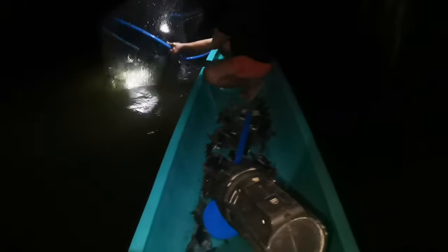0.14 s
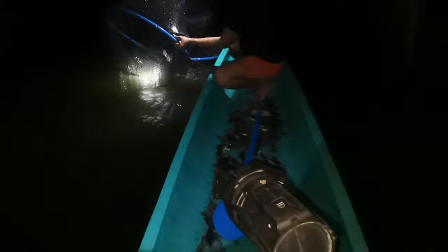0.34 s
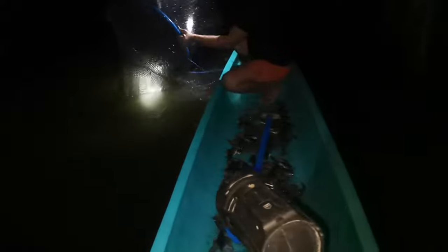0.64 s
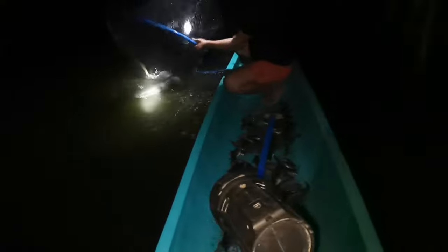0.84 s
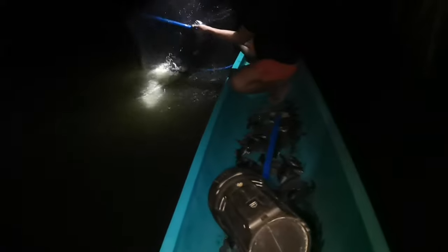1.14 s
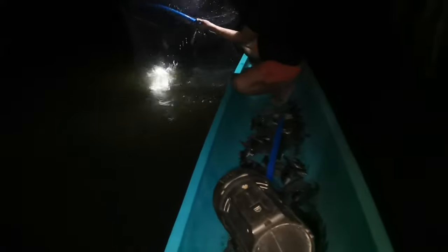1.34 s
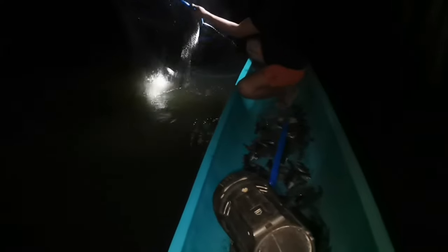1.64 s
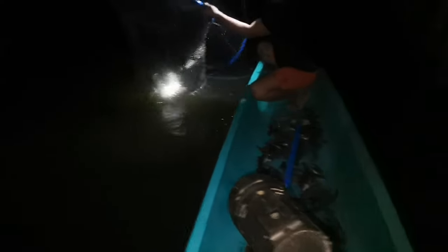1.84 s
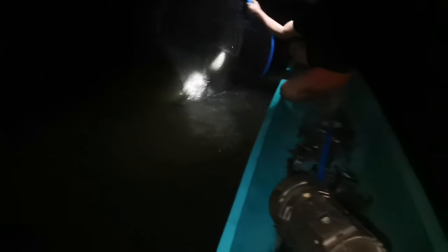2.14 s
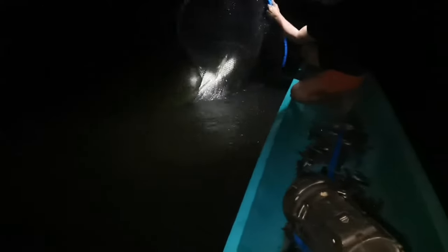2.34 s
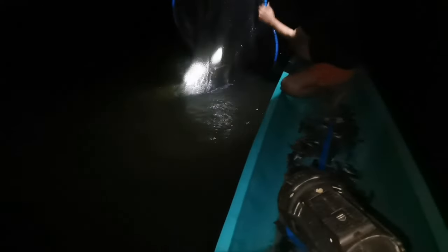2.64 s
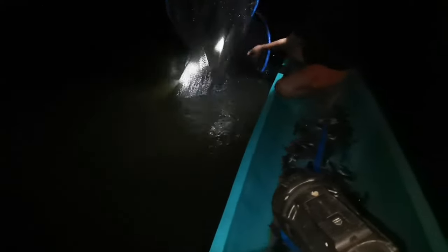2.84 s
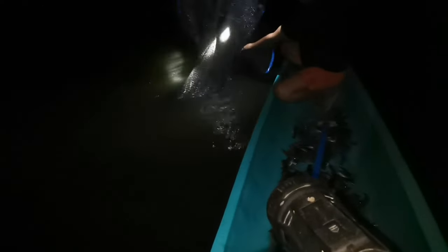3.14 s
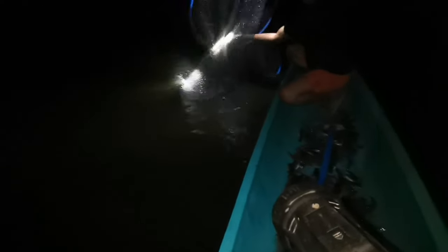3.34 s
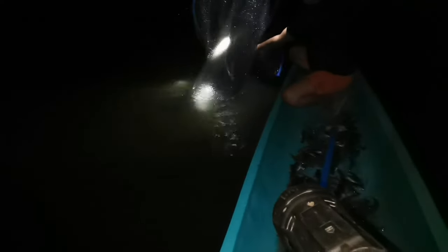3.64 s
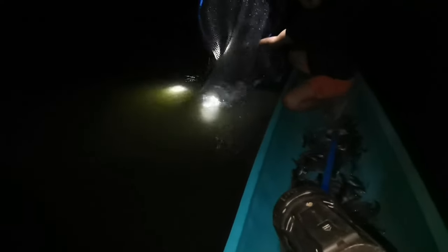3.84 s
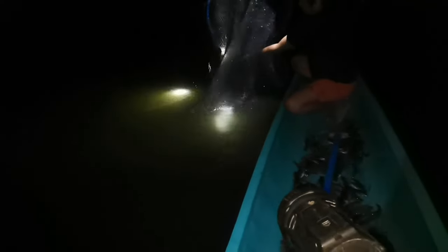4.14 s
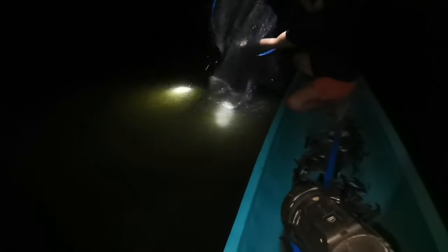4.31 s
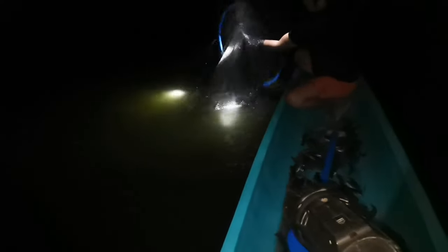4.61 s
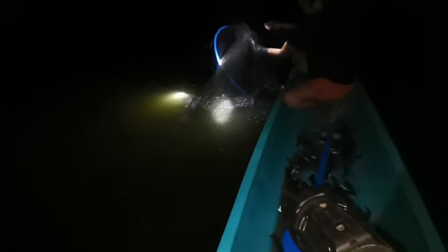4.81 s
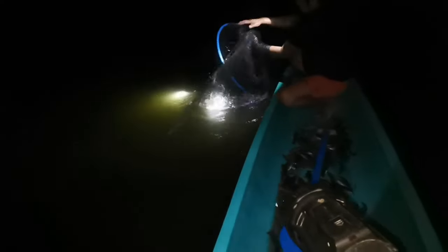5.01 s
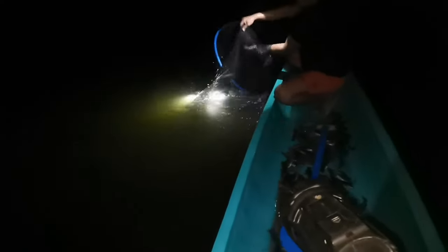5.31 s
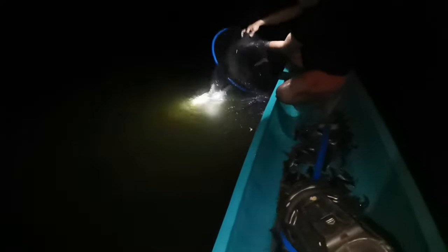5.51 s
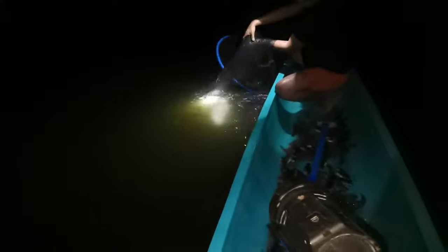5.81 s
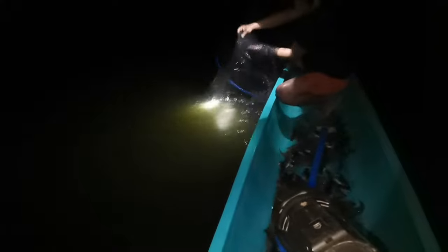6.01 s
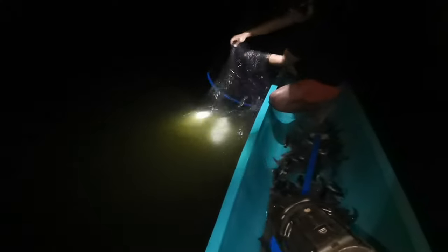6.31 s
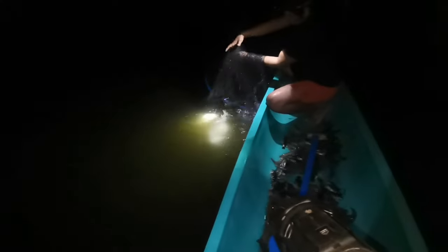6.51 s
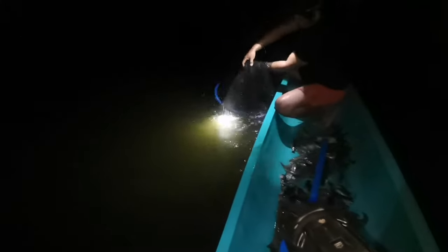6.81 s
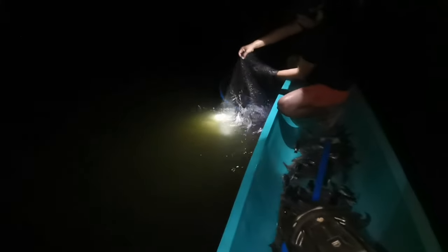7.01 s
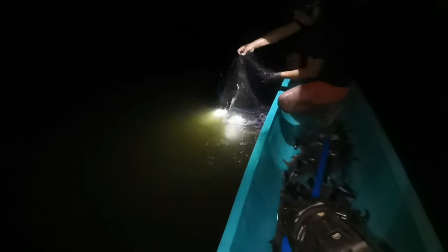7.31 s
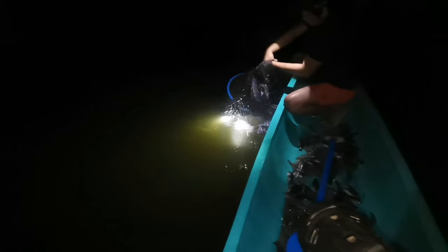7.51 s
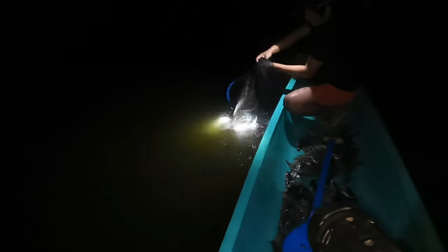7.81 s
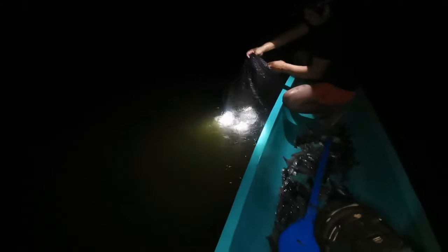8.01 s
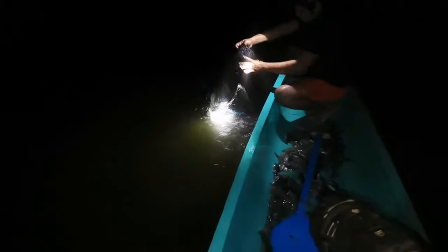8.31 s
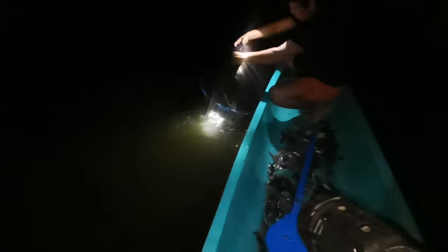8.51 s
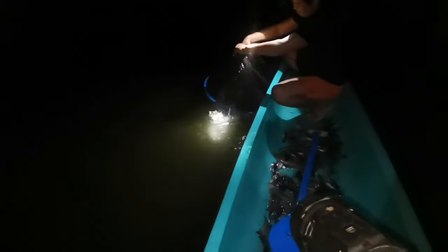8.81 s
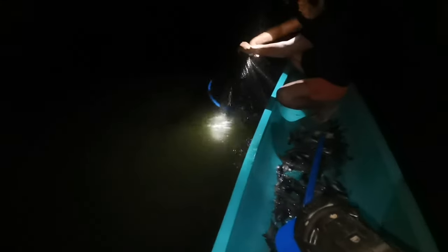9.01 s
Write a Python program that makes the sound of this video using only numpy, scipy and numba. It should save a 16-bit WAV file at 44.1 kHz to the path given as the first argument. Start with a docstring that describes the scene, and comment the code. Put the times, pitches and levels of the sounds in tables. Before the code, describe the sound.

Water gurgles, plops and drips off a net hauled from a pond at night, while a cricket chirps over a light rumbling breeze.

```python
"""A cricket chirps over a rumbling breeze as water starts to gurgle off a net hauled up beside a small
boat on a pond at night. The water sounds through bubbles, each a damped oscillator: large ones plop,
drops splat and fine spray fizzes; there is one sharp knock. The cricket, a katydid to the right and a
fitful third insect stridulate, driving wing resonances. One soft hoot passes, eddies buffet both
microphone ports, and far insects and lapping water merge into a hiss."""
import sys
import numpy as np
from scipy import signal
from scipy.fft import rfft, irfft, next_fast_len
from scipy.io import wavfile
from scipy.ndimage import uniform_filter1d, map_coordinates
from numba import njit

SR = 44100
rng = np.random.default_rng(int(sys.argv[2]) if len(sys.argv) > 2 else 0)


def store_wav(level_fs):
    """Save 16-bit WAV to argv[1]."""
    pcm = np.round(np.clip(np.atleast_2d(level_fs), -1, 1) * 32767)
    wavfile.write(sys.argv[1], SR, pcm.T.astype(np.int16))


N = 403499
SIDES = np.array([[1], [-1]])  # left, right; pan is the left level minus the right


# gushes off the shaken net: t/s, length/s, gurgle level/dB, fizz level/dB, spray level/dB, first f/Hz
GUSHES = [(0.541, 0.072, -62, -52, -52.5, 1300), (0.663, 0.078, -58, -50, -51, 1340),
          (0.81, 0.11, -54.5, -54.5, -79, 1156), (1.013, 0.15, -47.5, -46, -47.5, 1260),
          (1.224, 0.12, -57.5, -55, -54, 1240), (1.82, 0.16, -49.5, -53, -58, 1220),
          (1.998, 0.16, -51.5, -52.5, -55, 1080), (2.324, 0.15, -57, -62.5, -76, 1030),
          (2.847, 0.011, -52.5, -47.5, -52.5, 1120), (3.42, 0.027, -49, -45.5, -48, 1100),
          (3.482, 0.087, -57.5, -75, -79, 1210), (3.926, 0.094, -49, -53, -63, 907),
          (4.066, 0.14, -60, -54, -58, 1240), (4.414, 0.061, -50.5, -54, -53, 930),
          (4.535, 0.072, -45, -44.5, -48, 918), (4.799, 0.13, -55, -47.5, -53, 1234),
          (5.003, 0.22, -46, -50, -50, 1235), (5.284, 0.13, -51, -52, -56.5, 1003),
          (5.695, 0.031, -53.5, -52, -51.5, 1160), (5.783, 0.031, -55.5, -53.5, -56, 1100),
          (6.132, 0.056, -46, -56.5, -58.5, 1116), (6.33, 0.074, -59, -53, -53, 1050),
          (6.544, 0.075, -47.5, -52.5, -59, 1112), (6.7, 0.13, -53.5, -58, -78, 1114),
          (6.927, 0.14, -88, -86, -47, 1006), (7.142, 0.12, -49.5, -54, -55.5, 1092),
          (7.571, 0.17, -54.5, -54, -55.5, 947), (7.822, 0.1, -62.5, -55.5, -57.5, 1055),
          (7.963, 0.11, -50.5, -49.5, -55, 1228), (8.266, 0.017, -53.5, -52.5, -75, 1225),
          (8.35, 0.12, -53.5, -53, -64, 1100), (8.7, 0.02, -75, -70, -55, 1210),
          (8.792, 0.13, -55.5, -54, -65, 1077), (8.933, 0.07, -66, -57.5, -54, 1120)]

def runoff(trickle_hz=1005, sag_octaves_s=1.22):
    """Incoherent sources add in power: gushes, trickle and splats set three levels and a gurgle pitch."""
    t = np.arange(0, N / SR + .002, .002)
    s, length, *levels, first_hz = np.transpose(GUSHES)[:, :, None]
    slopes_db_s = (405, 8, 213), (517, 10, 233), (480, 12, 213)  # gurgle, fizz, spray
    trickle = undb((-68, -66, -65)) ** 2
    gush = [undb(db + envelope(t - s, length, *slopes)) ** 2 for db, slopes in zip(levels, slopes_db_s)]
    hz = first_hz * 2 ** (-sag_octaves_s * np.clip(t - s, 0, length))  # bubbles grow, so pitch sinks
    gurgle_hz = ((gush[0] * hz).sum(0) + trickle[0] * trickle_hz) / (gush[0].sum(0) + trickle[0])
    hit_s, hit_db, *_ = np.transpose(SPLATS)[:, :, None]
    burst = (undb(hit_db - 19.5 + envelope(t - hit_s, 0, 720, 0, 514)) ** 2).sum(0)
    power = np.sum(gush, axis=1) + trickle[:, None]
    power[1:] += burst  # splats throw up fizz and spray
    return curves(np.transpose([t, *(10 * np.log10(power)), gurgle_hz]))


def water():
    """Bubble resonance rises as radius falls: slosh and gurgle from large bubbles, fizz from small."""
    gurgle_db, fizz_db, spray_db, gurgle_hz = runoff()
    surge_db = 1.2 * walk(22)  # runoff comes in spurts
    patter = walk(170)  # droplets land in quick clusters
    gurgle = swarm(9000, gurgle_hz, octaves=.4024, cycles=34, rise=11.4, scatter=3.35, pan=3.8, width=4.2)
    slosh = swarm(2500, hz=436, octaves=.347, cycles=13.6, rise=20., scatter=4.1, pan=2.2, width=2.4)
    fizz = swarm(32000, hz=3026, octaves=.531, cycles=31.4, rise=3.7, scatter=1.55, pan=5.4, width=7.6)
    spray = swarm(50000, hz=7590, octaves=.48, cycles=13.3, rise=3.3, scatter=2.15, pan=.04, width=4.7)
    drips = swarm(1200, hz=3800, octaves=.7, cycles=59, rise=3.4, scatter=1.5, pan=.31, width=7.1)
    return (gurgle * undb(gurgle_db + surge_db)
            + slosh * undb(.81 * gurgle_db - 20)
            + fizz * undb(fizz_db - 6 + surge_db + 1.7 * patter)
            + spray * undb(spray_db - 5.5 + surge_db + 2.32 * patter)
            + drips * undb(fizz_db - 11))


def swarm(count, hz, octaves, cycles, rise, scatter, pan, width):
    """Superposition of bubbles random in time, size and place, at unit RMS; scatter and pan are in dB."""
    when, rarity, life = rng.random((count, 3)).T
    pitch, place = rng.standard_normal((count, 2)).T
    db = -scatter * np.log(rarity + .00058)
    centre_hz = (hz + np.zeros(N))[(when * N).astype(int)]
    return unit(bubbles(when * N / SR, centre_hz * 2 ** (octaves * pitch), cycles * (.5 + life), db,
                        pan_db=pan + 8.4 * place, lag=5.94 + .35 * width * place, rise=rise, glide=.054))


# large plops and one sharp knock: t/s, relative level/dB, f/Hz, ring time/cycles
PLOPS = [(0.578, -36, 2420, 19), (0.821, -35.5, 1320, 21), (1.023, -34, 1300, 29), (1.151, -24, 443, 15),
         (1.313, -34, 930, 23), (1.525, -32, 2010, 8.7), (1.805, -32.5, 1120, 36), (1.844, -34, 887, 31),
         (1.874, -27, 1380, 15.5), (2.334, -32, 2460, 17.3), (2.345, -32.5, 930, 11), (2.885, -39, 820, 12),
         (3.506, -31.5, 960, 20), (3.766, -42, 1390, 59), (3.954, -19, 894, 26), (4.001, -26, 842, 38),
         (4.146, -40, 1410, 54), (4.287, -38, 2470, 22), (4.399, -28, 798, 33), (4.547, -31, 792, 18),
         (5.037, -41, 1320, 11), (5.059, -16.5, 1414, 16.7), (5.1, -29.5, 446, 15.5),
         (5.112, -33.5, 297, 24), (5.13, -38, 1290, 27), (5.175, -36, 740, 25), (5.293, -43, 2390, 35),
         (5.305, -36, 592, 20), (5.372, -33.5, 486, 11), (5.687, -43, 2820, 16), (5.71, -23.5, 1170, 34),
         (5.788, -34.5, 915, 37), (6.1, -35, 1070, 8.5), (6.405, -35.5, 994, 36), (6.568, -30.5, 1280, 13),
         (6.602, -40.5, 494, 25), (6.76, -36, 1280, 25), (7.133, -42, 700, 18), (7.162, -37.5, 1165, 38),
         (7.193, -35, 1037, 40), (7.252, -39, 1280, 70), (7.593, -35, 610, 25), (7.652, -34, 870, 19),
         (7.982, -27.5, 1940, 10.6), (8.008, -33.5, 1950, 15), (8.021, -36, 950, 20.7),
         (8.049, -35.5, 617, 11.6), (8.1, -39, 473, 16), (8.395, -37.5, 973, 66), (8.773, -37.5, 1070, 17),
         (8.853, -34, 1260, 15), (8.897, -36, 750, 35)]

def plops(count=16):
    """Free oscillation: each plop or knock rings and rises in pitch amid a froth of small bubbles."""
    s, db, hz, cycles = np.transpose(PLOPS)[:, :, None]
    main = bubbles(s, hz, cycles, db + 1, pan_db=5, lag=6, rise=6., glide=.012)
    when, pitch, size = np.moveaxis(rng.standard_normal((len(PLOPS), count, 3)), -1, 0)
    froth_s = s + cycles / hz * (.03 + .22 * np.abs(when))
    froth_hz = hz * 2 ** (.814 * np.abs(pitch) - .3)
    froth_db = db - 10.5 - 4.5 * np.abs(pitch) + 4.5 * size
    froth = bubbles(froth_s, froth_hz, cycles=14, db=froth_db, pan_db=4, lag=6 + when, rise=5.4, glide=.065)
    return main + froth


# drops bursting on water and hull: t/s, relative level/dB, centre f/Hz, spatter time/ms
SPLATS = [(0.215, -39, 3730, 3.4), (0.575, -30.5, 7800, 3.8), (0.82, -40, 5360, 3.9),
          (1.147, -34, 2470, 5.6), (1.2445, -24.5, 8640, 3.65), (1.789, -33.5, 8910, 0.84),
          (1.878, -32, 5100, 2.8), (2.0293, -26.5, 5370, 2.66), (2.129, -34, 5410, 2.6),
          (2.424, -37, 6300, 2.7), (3.412, -35, 3480, 3), (3.429, -28, 4800, 4.8), (3.439, -38, 4200, 2.8),
          (3.498, -37.5, 4500, 1.3), (3.5058, -25.5, 8400, 2.2), (3.654, -35, 5200, 1.4),
          (3.68, -33.5, 7800, 3.6), (3.769, -39.5, 4500, 3.7), (3.904, -37, 3780, 2.9),
          (3.936, -25, 5040, 6.8), (3.955, -27.5, 2980, 4.3), (4.077, -37.5, 3660, 3.8),
          (4.3898, -28, 5360, 3.5), (4.6033, -28.5, 5500, 2.2), (4.7898, -34, 6250, 2.8),
          (4.981, -31, 3340, 2.97), (5.0767, -28, 7060, 3.8), (5.2866, -40, 6960, 2.9),
          (5.6286, -33, 9500, 2.2), (5.706, -32.5, 3330, 3.5), (6.108, -30.5, 3630, 2.8),
          (6.382, -28.5, 7160, 2.6), (6.7356, -30.5, 5400, 2.1), (6.8083, -31.5, 7850, 2.1),
          (7.11, -35, 4350, 2.7), (7.3732, -31, 3830, 2.4), (7.53, -38.5, 3600, 1.7),
          (7.546, -32, 3020, 2.5), (7.567, -26, 5500, 3.2), (7.644, -39.5, 4300, 1.7),
          (8.2294, -32.5, 7600, 2.8), (8.247, -36.5, 4000, 2.6), (8.3518, -32.5, 3400, 3),
          (8.399, -32.5, 3500, 3.04), (8.6326, -31, 4630, 1.46), (8.701, -35, 5900, 2.8),
          (8.779, -37, 2500, 3.4)]

def splats(count=40):
    """Impact excitation: a drop cracks and breaks into droplets that thin out exponentially."""
    s, db, hz, spatter_ms = np.transpose(SPLATS)[:, :, None]
    chance, jitter, place = np.moveaxis(rng.random((len(SPLATS), count, 3)), -1, 0)
    droplet_hz = hz * 2 ** (.55 * rng.standard_normal((len(SPLATS), count)))
    crack = np.arange(count) < 3
    delay = np.where(crack, .1 * chance, -np.log(chance + .013) + .3 * jitter)
    droplet_db = db - 5.5 + 8.9 * crack - 1.36 * delay
    return bubbles(s + delay * spatter_ms / 1000, droplet_hz, cycles=6, db=droplet_db,
                   pan_db=.74, lag=4.5 + 3 * place, rise=3.15, glide=0.)


def bubbles(s, hz, cycles, db, pan_db, lag, rise, glide):
    """Arrival-time difference: low notes reach the right port slightly later, widening the water sound."""
    s, hz, cycles, db, pan_db, lag = map(np.ravel, np.broadcast_arrays(s, hz, cycles, db, pan_db, lag))
    start = np.clip(s * SR, 0, N - 1).astype(int)
    omega = 2 * np.pi * np.clip(hz, 100, 15000) / SR
    left, right = undb(db + SIDES * pan_db / 2)
    lag = np.clip(lag + 3800 / np.maximum(hz, 700), 0, 60).astype(int)  # samples
    return ring(N, start, omega, np.maximum(cycles, .5), rise, glide, left, right, lag)


@njit
def ring(n, start, omega, cycles, rise, glide, left, right, lag):
    """Damped oscillators (omega in rad/sample) swell over `rise` rad and lose 60 dB in `cycles` periods."""
    out = np.zeros((2, n + 4096))
    for b in range(len(start)):
        decay = np.exp(-1.1 * omega[b] / cycles[b])
        amplitude, phase, w = 1., 0., omega[b]
        for i in range(4000):
            pressure = amplitude * min(i * w / rise, 1.) * np.sin(phase)
            out[0, start[b] + i] += left[b] * pressure
            out[1, start[b] + i + lag[b]] += right[b] * pressure
            phase += w
            amplitude *= decay
            w = min(w * (1 + glide * omega[b] / cycles[b]), 2.8)  # the pitch slides up
            if amplitude < .003:
                break
    return out[:, :n]


# response to the water sounds: f/Hz, gain/dB
PORT_RESPONSE = [(300, -0.5), (920, 0.5), (1090, -2.5), (1280, 1.5), (5500, 5.5), (7800, 12), (10000, 2.5),
                 (12500, -4.5), (15000, -3.5)]
# delay at the left port as the boat turns: t/s, delay/samples
LEFT_DELAY = [(0, 3.9), (1.6, 2.96), (2.8, 6.34), (9.15, 7.86)]

def water_path(x):
    """Interference with the hull echo cuts a notch, port resonance adds a peak, and the left delay drifts."""
    left, right = colour(x, PORT_RESPONSE)
    delayed = map_coordinates(left, [np.arange(N) - curves(LEFT_DELAY)[0]], mode="nearest")
    return np.array([delayed, right])


# quickening strokes that open the cricket's phrases: t/s, number of strokes
OPENINGS = [(0.443, 5), (0.838, 6), (1.826, 6), (2.639, 6), (3.578, 4), (4.132, 6), (5.167, 6), (5.998, 4),
            (6.948, 5), (7.87, 5), (8.592, 5)]
# its chirps: t/s, number of strokes
CHIRPS = [(0.004, 2), (0.138, 2), (0.276, 2), (1.177, 2), (1.298, 2), (1.416, 2), (1.534, 2), (1.668, 2),
          (2.154, 3), (2.31, 3), (2.468, 3), (2.961, 3), (3.127, 2), (3.244, 2), (3.371, 2), (3.834, 2),
          (3.968, 2), (4.454, 3), (4.619, 3), (4.773, 2), (4.895, 2), (5.016, 2), (5.491, 2), (5.61, 3),
          (5.781, 2), (6.224, 3), (6.363, 3), (6.517, 3), (6.669, 3), (6.782, 3), (7.225, 3), (7.384, 3),
          (7.54, 3), (7.699, 3), (8.153, 3), (8.315, 3), (8.473, 2), (8.875, 3), (9.044, 3)]

def stroke_times():
    """Pulse trains: the centre time in seconds of every wing stroke."""
    patterns = (OPENINGS, (.062, .057, .053, .042, .037)), (CHIRPS, (.0355, .041))
    return [s + offset for table, gaps_s in patterns
            for s, count in table for offset in np.cumsum((0, *gaps_s))[:count]]


# the cricket as the boat turns: t/s, level/dB, pan/dB
CRICKET_LEVEL = [(0.0, -40, 14), (.6, -40, 6.5), (.9, -37.5, 9), (1.2, -37.5, 9), (1.83, -41.5, 8),
                 (2.6, -34, 1), (3.1, -36.5, -3), (3.7, -37, -0.5), (4.88, -37, 1.5), (6.1, -41.5, -3.5),
                 (6.71, -47.5, -5.5), (7.3, -42.5, -5.5), (9.15, -44, -4.5)]
# pitch through one stroke: t/s from its centre, f/Hz
STROKE_PITCH = [(-.017, 5480), (-.009, 5710), (-.001, 5600), (.014, 5230)]

def cricket(lag_s=.000091):
    """Stridulation: each stroke is a falling near sine, half a cycle late on the left; reeds smear it."""
    t = np.arange(-.017, .02, 1 / SR)
    hz = np.interp(t, *np.transpose(STROKE_PITCH))
    attack = np.clip((t + .018) / .0089, 0, 1) ** 2.3
    release = np.clip((.0145 - t) / .012, 0, 1) ** .36
    times, span = stroke_times(), len(t)
    song = np.zeros((2, N + 2 * span))
    for s, (force, detune, sway, skew) in zip(times, rng.standard_normal((len(times), 4))):
        i = int((s - .017) * SR) + span
        omega = 2 * np.pi * hz * (1 + .005 * detune)
        delay_s = np.array([[lag_s * (1 + .05 * skew)], [0]])
        tone = np.sin(np.cumsum(omega / SR) - delay_s * omega)
        song[:, i:i + span] += undb(1.4 * force + 1.26 * sway * SIDES) * attack * release * tone
    song = song[:, span:span + N]
    mid, side = rng.standard_normal((2, 6000)) * np.exp(-np.arange(6000) / 600)
    echo = signal.fftconvolve(song, mid + .4 * side * SIDES, axes=1)[:, :N]
    db, pan_db = curves(CRICKET_LEVEL)
    return (song + undb(-33) * echo) * undb(db + SIDES * pan_db / 2)


# the katydid's buzz: t/s, level/dB
KATYDID_LEVEL = [(0.0, -68), (.6, -67), (1.91, -59.5), (2.19, -64.5), (2.7, -64.5), (3.0, -59), (3.3, -63),
                 (3.62, -68), (4.77, -63), (5.86, -69), (7.92, -65), (8.18, -72.5), (8.8, -68.5),
                 (9.15, -63)]

def katydid(rate_hz=187.7, wing_hz=9260):
    """Impulse excitation: wing teeth strike fast and evenly, each briefly ringing a raspy resonance."""
    phase = np.cumsum(rate_hz * (1 + .0029 * walk(1)) / SR) % 1
    tone = np.sin(2 * np.pi * wing_hz / rate_hz * phase) * undb(2.07 * walk(60))
    strikes = np.exp(-phase / .29) * (tone + 2.8 * rng.standard_normal((2, N)))
    return unit(band(strikes, wing_hz, 560)) * undb(curves(KATYDID_LEVEL)[0] - 3.87 * SIDES)


# a fitful insect's buzzes: t/s, length/s, f/Hz, level/dB, rattle rate/Hz
TRILLS = [(2.455, 0.19, 8300, -65, 147), (3.952, 0.23, 7930, -60, 95), (4.71, 0.17, 7760, -58, 152),
          (5.367, 0.18, 7750, -58.5, 154), (5.857, 0.15, 7850, -58.5, 151), (6.17, 0.22, 7850, -55.5, 94.3),
          (6.514, 0.157, 7800, -59.5, 95), (7.226, 0.16, 7640, -64, 151), (8.16, 0.13, 7800, -60, 153)]

def trills():
    """Forced vibration: a rattling wing drives one narrow resonance in short buzzes."""
    t, out, rasp = np.arange(N) / SR, 0, rng.standard_normal(N)
    for s, length, hz, db, rate_hz in TRILLS:
        rattle = (1 + np.sin(2 * np.pi * rate_hz * t)) ** 3 * (.36 + rasp)
        drive = rattle * (1 + np.sin(2 * np.pi * hz * t))
        swell = np.sin(np.pi * np.clip((t - s) / length, 0, 1)) ** .13
        out += undb(db) * swell * unit(band(drive, hz, 420))
    return out * undb(.5 * SIDES)


# a short soft hoot: t/s, length/s, first f/Hz, last f/Hz, peak level/dB
HOOT = [(2.634, .071, 436, 491, -42)]

def hoot():
    """A linear frequency sweep: one rising tone, perhaps air squeezed from a pocket in the net."""
    (s, length, first_hz, last_hz, db), = HOOT
    progress = np.clip((np.arange(N) / SR - s) / length, 0, 1)
    hz = first_hz + (last_hz - first_hz) * progress
    return undb(db) * np.sqrt(np.sin(np.pi * progress)) * np.sin(np.cumsum(2 * np.pi * hz / SR))


# breeze on the ports: t/s, relative level/dB, pan/dB
BREEZE_LEVEL = [(0.0, -41.5, -0.5), (0.51, -50, 11.5), (0.61, -55, -17), (0.72, -48, 21), (0.88, -47, 11.5),
                (1.05, -53, -6), (1.17, -46.5, 12.5), (1.38, -51.5, -12.5), (1.62, -40.5, 14),
                (1.72, -40, 0), (1.9, -34, 5), (2.05, -36, 1.5), (2.39, -43.5, -6.5), (2.58, -49.5, 12),
                (2.7, -34.5, -4.5), (3.0, -47.5, -2.5), (3.1, -39, -10), (3.26, -40, 2.5),
                (3.54, -51.5, -9.5), (3.92, -41.5, -4), (4.06, -48.5, -11.5), (4.27, -38.5, -6),
                (4.87, -51.5, 3), (5.25, -42, 5.5), (5.4, -45, -1), (6.1, -49, -0.5), (6.47, -46, 9),
                (6.85, -51, -1), (8.9, -55.5, 6), (9.15, -47, 8)]
# its spectrum: f/Hz, relative level/dB
BREEZE_SPECTRUM = [(12, -52), (20, -1.5), (81, 1.5), (130, -2), (217, -11.5), (348, -31.5), (449, -29),
                   (500, -49), (650, -46), (1100, -120)]
# sudden buffets: t/s, level/dB above the breeze
BUFFETS = [(.294, 4.5), (.798, 8), (1.5, 9), (1.644, 5), (1.876, 4), (2.686, 7.5), (3.211, 5), (5.24, 5.5),
           (5.52, 7), (5.837, 9), (6.478, 9)]

def breeze(buffet_s=.016):
    """Turbulence: eddies buffet each port separately; strong gusts reach higher and the level flutters."""
    t = np.arange(N) / SR
    db, pan_db = curves(BREEZE_LEVEL)
    db += sum(boost_db * np.exp(-((t - s) / buffet_s) ** 2) for s, boost_db in BUFFETS)
    noise = colour(rng.standard_normal((2, N)), BREEZE_SPECTRUM)
    rumble = signal.sosfilt(signal.butter(1, 140, fs=SR, output="sos"), noise)
    flutter, brightness = (np.array([walk(14), walk(14)]) for _ in range(2))
    gusts = rumble + (noise - rumble) * undb(.54 * (db + 37) + 2.4 * brightness)
    return unit(gusts) * undb(db + 6.5 + SIDES * pan_db / 2 + 1.77 * flutter)


# spectrum of the distant hiss: f/Hz, relative level/dB
NIGHT_SPECTRUM = [(300, 8.5), (680, -13), (3300, -13.5), (6400, -10), (9300, -13), (12000, -20.5),
                  (15000, -32)]

def night(db=-57):
    """Incoherent summation: far insects and lapping water blur into a soft, swaying hiss."""
    mid, side = rng.standard_normal((2, N))
    return unit(colour(mid + .5 * side * SIDES, NIGHT_SPECTRUM)) * undb(db + walk(3.276))


def envelope(t, length, swell_db_s, drain_db_s, release_db_s):
    """Exponential growth and decay, in dB: a swell up to t = 0, a slow drain, a release."""
    return (swell_db_s * np.minimum(t, 0) - drain_db_s * np.clip(t, 0, length)
            - release_db_s * np.maximum(t - length, 0))


def curves(table):
    """Linear interpolation of each column over time."""
    s, *columns = np.transpose(table)
    return [np.interp(np.arange(N) / SR, s, column) for column in columns]


def colour(x, points):
    """Spectral shaping by (f/Hz, gain/dB) points on a log frequency axis."""
    hz, db = np.transpose(points)
    size = next_fast_len(N)
    f = np.maximum(np.arange(size // 2 + 1) * SR / size, 1)
    gain = undb(np.interp(np.log(f), np.log(hz), db))
    return irfft(rfft(x, size) * gain, size)[..., :N]


def band(x, hz, half_width_hz):
    """A resonance as a band-pass filter."""
    edges = [hz - half_width_hz, hz + half_width_hz]
    return signal.sosfilt(signal.butter(2, edges, "band", fs=SR, output="sos"), x)


def walk(rate_hz):
    """Random modulation: held values, smoothed twice."""
    hold = int(SR / rate_hz)
    steps = np.repeat(rng.standard_normal(N // hold + 1), hold)
    return 1.94 * uniform_filter1d(uniform_filter1d(steps, hold), hold)[:N]


def undb(db):
    """Level to amplitude."""
    return 10 ** (np.asarray(db) / 20)


def unit(x):
    """Normalisation to unit RMS."""
    return x / np.sqrt(np.mean(x ** 2))


def scene():
    """Linear superposition of all sources at the two ports."""
    net = water_path(water() + plops() + splats())
    return net + hoot() + cricket() + katydid() + trills() + breeze() + night()


def record(dry):
    """Band limiting: a steep low-pass removes the treble above 15.3 kHz."""
    return signal.sosfilt(signal.ellip(6, .2, 50, 15300, fs=SR, output="sos"), dry)


dry = scene()
out = record(dry)
store_wav(out)
```